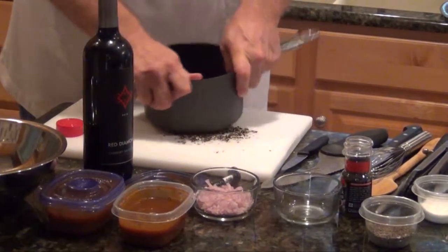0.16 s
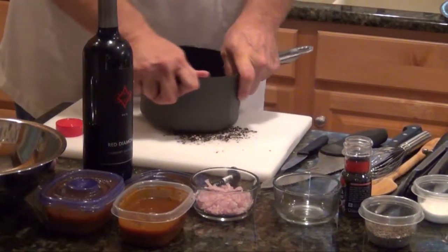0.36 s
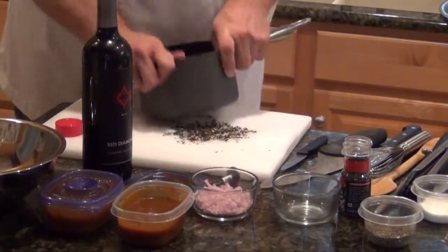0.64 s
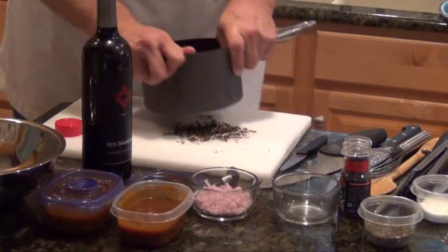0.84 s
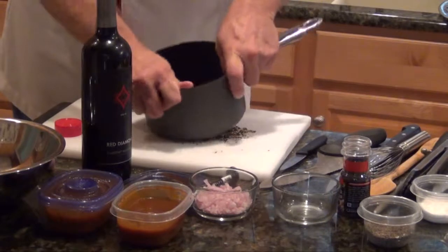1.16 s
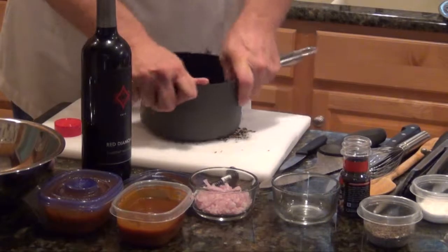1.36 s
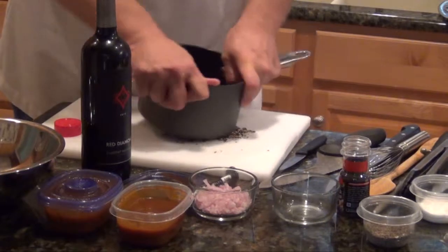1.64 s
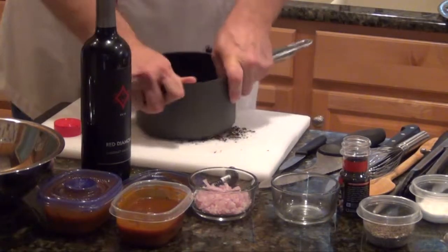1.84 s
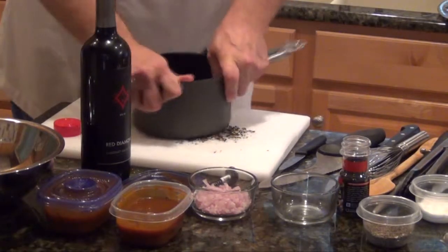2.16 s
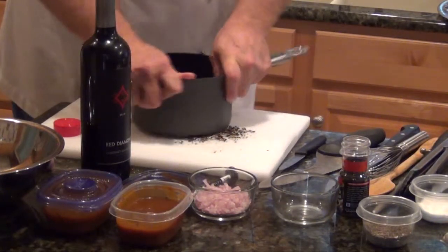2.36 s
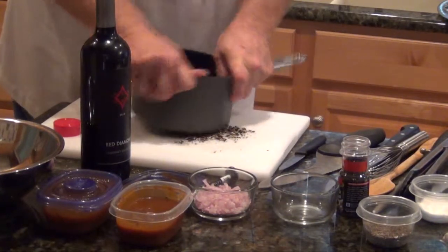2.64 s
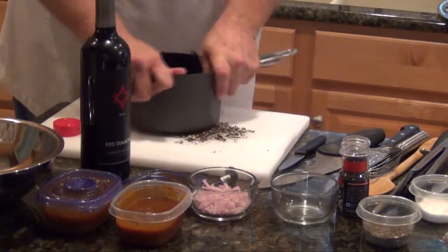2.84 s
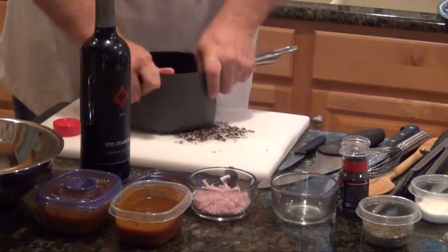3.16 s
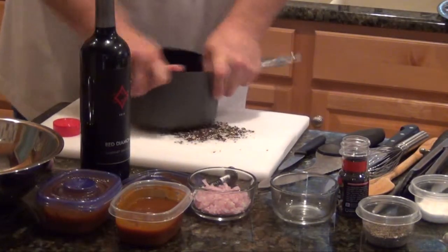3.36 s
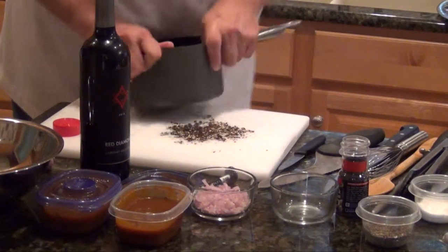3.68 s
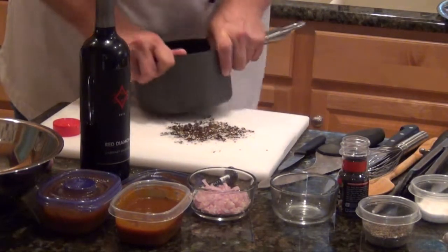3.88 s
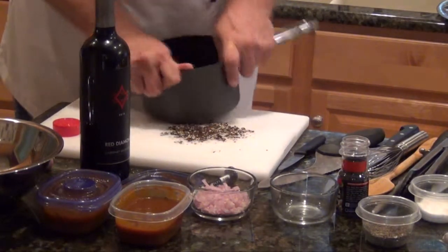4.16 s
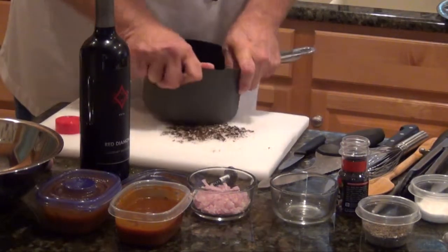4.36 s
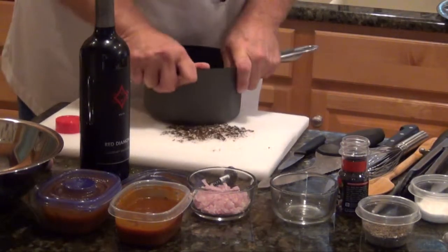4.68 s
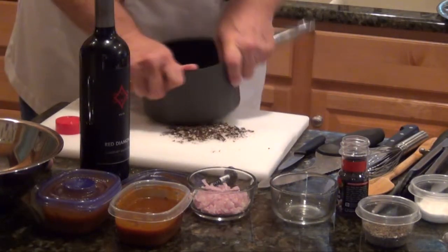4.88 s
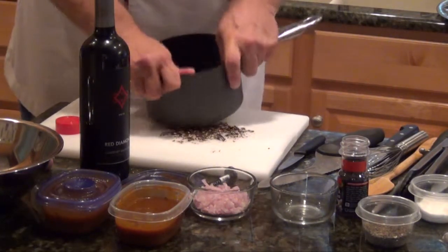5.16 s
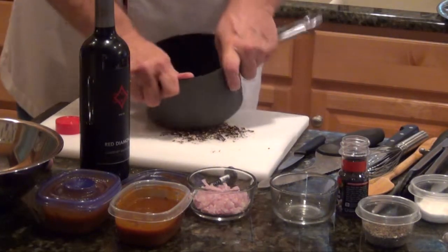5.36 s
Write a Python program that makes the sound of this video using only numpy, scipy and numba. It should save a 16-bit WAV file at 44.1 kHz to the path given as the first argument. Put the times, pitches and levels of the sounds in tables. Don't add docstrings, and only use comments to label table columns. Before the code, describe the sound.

Peppercorns crack sharply under a heavy metal saucepan rocked on a plastic board, with knocks, grinding crumbs and a faint fridge hum in a kitchen.

```python
import sys
import numpy as np
from scipy import signal
from scipy.fft import rfft, irfft, next_fast_len
from scipy.io import wavfile
from scipy.ndimage import uniform_filter1d, minimum_filter1d, map_coordinates
from numba import njit

SR = 44100
rng = np.random.default_rng(int(sys.argv[2]) if len(sys.argv) > 2 else 0)


def to_wav(s):
    ch = np.atleast_2d(s).T
    pcm = np.round(np.clip(ch, -1, 1) * 32767)
    wavfile.write(sys.argv[1], SR, pcm.astype(np.int16))


def how_loud(loudness_db):
    steps = np.asarray(loudness_db, float) / 20
    return 10 ** steps


N = 243240
BLOW_N = 8192

# (frequency [Hz], density [dB per Hz])
AIR_COLOUR = [(12, -71), (40, -39), (90, -32), (140, -15.5), (223, -12.5), (263, -13.5), (310, -14),
              (1160, -28.5), (2930, -29.5), (4550, -25.5), (14000, -34.5), (16500, -63)]
# (frequency [Hz], level [dB], width [Hz])
FRIDGE_TONES = [(124.7, -50, 6.4), (168, -45.5, 4)]
# (frequency [Hz], side minus mid [dB])
STEREO_WIDTH = [(60, -23), (110, -6), (200, -19), (380, -18.5), (700, -14), (1290, -14.5), (2380, -13.5),
                (4400, -13), (8120, -12.5), (15000, -16)]
# (frequency [Hz], t60 [s])
ROOM_T60 = [(200, 0.39), (600, 0.5), (1500, 0.52), (4000, 0.51), (10000, 0.37)]
# (frequency [Hz], level [dB])
WALL_COLOUR = [(200, 1), (1000, -3), (3000, -2.5), (7000, -3.5), (13000, -10.5)]
# (frequency [Hz], level [dB])
GROAN_COLOUR = [(20, -12), (40, -2), (70, -0.5), (110, -8.5), (200, -58)]
# (time of strongest swing [s], peak [dB])
THUMPS = [(.516, -25.5), (0.563, -30), (1.147, -25), (1.216, -24), (1.705, -36), (2.258, -32), (2.491, -25),
          (3.151, -19), (3.187, -23), (3.499, -22), (4.317, -15), (4.356, -27), (4.742, -30.5),
          (4.903, -24), (4.937, -35), (5.274, -29)]
# (time [s], peak [dB], frequency [Hz], t60 [s])
PINGS = [
    (0.884, -36, 1150, 0.2),
    (1.128, -16.5, 816, 0.067),
    (1.193, -25.5, 795, 0.083),
    (3.962, -37, 1150, 0.12),
    (4.418, -19, 690, 0.04),
    (5.251, -38, 6100, .15),
    (5.269, -36, 6100, .15),
]
# (time [s], pressure [dB])
PRESSURE = [(0, -13.5), (.14, -56), (.31, -31.5), (.49, -31), (.75, -46.5), (1.18, -52.5), (1.3, -33.5),
            (1.7, -29), (2.1, -39), (2.35, -33), (2.7, -42), (3.38, -43), (3.78, -51.5), (4.1, -46),
            (4.4, -33.5), (5.1, -47.5), (5.4, -40), (5.47, -27.5)]
# (time [s], peak [dB])
RIM_HITS = [
    (4.397, -6),
    (4.409, -9),
    (4.424, -10.5),
    (4.44, -21),
]
# (time [s], peak [dB], clack [dB], colour centre [Hz])
KNOCKS = [(.226, -4, -17, 990), (.318, -33, -11, 1100), (.506, 0, -6, 1150), (.519, 1.5, 0.5, 1235),
          (.545, -4.5, -17, 1130), (1.846, -11, 6.5, 1200), (2.469, -.5, -15, 685), (2.768, 0.5, -19, 925),
          (2.781, -1.5, -8, 850), (2.8, 3, -18, 950), (3.1274, 3.5, 0, 1150), (3.132, 2, -9, 1090),
          (3.17, -1, -7.5, 1020), (3.2, -8.5, -15, 900), (3.465, 2, -3, 1157), (3.49, -3.5, -10.5, 990),
          (4.15, -27.5, -5, 1000), (4.224, -15.5, -19, 920), (4.301, -1.5, -28, 556),
          (4.325, 2, -10.5, 1150), (4.398, -36, -12, 1270), (4.524, -9.5, -15, 1090),
          (4.724, -12.5, -8.5, 930), (4.881, 3.5, -4.5, 1194), (4.895, -1.5, 0.5, 1130),
          (4.915, -5.5, -6, 860), (5.27, -13.5, -14, 990), (5.482, -21, -7, 1220)]
# (time [s], peak [dB], colour centre [Hz])
TAPS = [
    (.883, -31, 1090),
    (1.128, -7, 810),
    (1.182, -18, 860),
    (1.193, -13, 785),
    (3.9606, -8, 760),
]
# (time [s], peak [dB], pan body [dB], splintering time [s])
BURSTS = [(0.0616, -4.5, -13, 0.04), (0.1729, -4, -23, .05), (0.1739, -9.5, -1.5, 0.029),
          (0.2131, 0.5, -8, 0.048), (.2202, -1.5, -11, 0.023), (.2504, -4.5, -5, 0.11),
          (.2859, -10, -4.5, 0.088), (.3731, -13.5, -6, 0.015), (0.4399, -5, -9, 0.012),
          (1.392, -6, -10.5, 0.015), (1.446, -1, -5.5, 0.022), (1.5276, -3.5, -24, 0.016),
          (1.5427, -11.5, -2.5, 0.12), (1.712, 1, -10.5, 0.018), (1.8379, -3.5, -13, 0.038),
          (2.1134, -16.5, -6.5, 0.11), (2.271, -9, 0.5, 0.07), (2.2833, -2.5, -10, 0.016),
          (2.4365, -8, 2, 0.061), (2.4515, -6.5, -32, 0.031), (2.6073, -6.5, -3.5, 0.06),
          (2.8929, -8, 1, 0.038), (2.8968, -6.5, -29, 0.051), (3.3154, 0, -8, 0.053),
          (3.3435, -8.5, -4.5, 0.096), (3.4355, -4, -11.5, 0.028), (4.2663, -16.5, -11, 0.11),
          (4.277, -5, -3.5, 0.023), (4.8821, -11, 2, 0.051), (5.475, -6, -12.5, 0.051)]
# (time [s], peak [dB], pan body [dB], board [dB])
CHIPS = [(.0284, -33, 4, -6), (0.4972, -12.5, 4.5, -8), (.5064, -23, 10, 8), (1.1265, -15.5, -14, 0),
         (1.288, -19.5, -14, -7), (1.3116, -23, -11, 8.5), (1.474, -23.5, 9.5, -20), (1.66, -16, -24, -40),
         (1.6905, -42.5, 20, -4), (1.9719, -20, -6, 0.5), (2.091, -20.5, -6.5, -2), (2.7237, -20, -14, -6),
         (2.7551, -29.5, 6, 10), (2.8005, -13.5, 4, 1), (3.101, -30.5, -3, 17.5), (3.1133, -26, 4, 5),
         (3.2832, -27.5, 0, 4), (3.6267, -26.5, 2.5, 12), (4.2224, -27, -8, -12), (4.258, -26.5, 1, 5),
         (4.2943, -24.5, 5, 20.5), (4.4114, -22.5, 2, 0), (4.5261, -20.5, -2, -10), (4.554, -16, -10, -17),
         (4.724, -26.5, 5, -12), (5.2496, -30, -4, 3), (5.2685, -22.5, -7, -0.5), (5.453, -20.5, -11, 10),
         (5.464, -15, -13, -3), (5.4894, -24, 3, 4)]
# (frequency [Hz], width [Hz], level [dB])
PAN_MODES = [(1150, 157, -49), (2157, 138, 17), (3634, 196, -6), (4348, 77, 6), (5187, 186, -16.5),
             (5820, 87, -20), (6130, 114, -3.5), (7427, 114, 14.5), (8410, 120, -32), (8990, 180, 2),
             (9975, 180, -14), (11070, 260, -2.5), (12250, 220, -6)]
# (frequency [Hz], width [Hz], level [dB])
BOARD_MODES = [(507, 103, -14), (696.6, 16.5, 25), (795, 58, -5), (900, 103, 18), (1090, 115, 3.5),
               (1150, 69, 17), (1465, 58, -4), (1540, 34, 16), (1692, 31, -15)]
# (frequency [Hz], level [dB])
SNAP = [(1200, -70.5), (3000, -7), (4500, -3.5), (6300, -3.5), (9000, 2.5), (12500, 1), (13500, 2),
        (15800, -3), (16800, 0)]
# (frequency [Hz], level [dB])
PAN_BODY = [(700, -62.5), (1600, -21.5), (2400, 7.5), (3800, -2), (6000, -6.5), (12000, -81.5)]
# (frequency [Hz], level [dB])
SLAB = [(200, -25), (400, -4.5), (600, 0.5), (900, 2), (1250, 2.5), (1700, -2), (2600, -29), (6000, -32.5),
        (14000, -123)]
# (frequency [Hz], level [dB])
CLACK = [(700, -25), (1500, -8), (2200, 6), (3200, -1.5), (4500, -7.5), (7000, -16.5), (12000, -23),
         (16000, -71)]
# (frequency [Hz], level [dB])
COUNTER = [(40, -63), (90, -12.5), (130, -0.5), (230, 22), (380, -1), (800, -83)]
# (frequency [Hz], level [dB])
RIM_COLOUR = [(700, -42), (1500, -2), (1900, 6.5), (2400, 9.5), (2900, -12.5), (6000, -36), (14000, -70)]
# (edge [Hz], treble needed to keep what lies above [dB])
TREBLE_GATES = [(14350, -72.5), (15050, -62), (15900, -47)]


def unit(x):
    return x / np.sqrt(np.mean(x ** 2) + 1e-20)


def along(points, hz):
    f, v = np.transpose(points)
    return np.interp(np.log(hz + 1), np.log(f + 1), v)


def causal(points, hz):
    cepstrum = irfft(along(points, hz) * np.log(10) / 20)
    half = cepstrum.shape[-1] // 2
    cepstrum[..., 1:half] *= 2
    cepstrum[..., half + 1:] = 0
    return np.exp(rfft(cepstrum))


def resonances(modes, hz, extra_db, sharp):
    f, width, db = np.transpose(modes)[:, :, None]
    damping = 1j * hz * width * sharp
    shapes = damping / (f * f - hz * hz + damping)
    signs = (-1.) ** np.arange(len(f))[:, None]
    return how_loud(extra_db) @ (shapes * how_loud(0.27 * db) * signs)


def filtered(x, response):
    m = next_fast_len(N + SR) // 2 * 2
    return irfft(rfft(x, m) * response(np.fft.rfftfreq(m, 1 / SR)), m)[..., :N]


def spread(pair, extra_db):
    side = filtered(pair[1], lambda hz: how_loud(along(STEREO_WIDTH, hz) + extra_db))
    return np.array([pair[0] + side, pair[0] - side])


def blows(events, colours, modes, ring_db, sharp, scatter_db, spikes, onset, push):
    s, db, second_db, third_db, life, *centre = np.transpose(events)[:, :, None]
    t, hz = np.arange(BLOW_N) / SR, np.fft.rfftfreq(BLOW_N, 1 / SR)
    chance = rng.standard_normal((len(s), 2 * BLOW_N + len(modes)))

    swings = uniform_filter1d(chance[:, BLOW_N:2 * BLOW_N], size=25, axis=1) * 5
    burst = chance[:, :BLOW_N] * how_loud(spikes * swings) * how_loud(-60 * t / np.clip(life, .003, .1))
    burst *= 1 + onset * np.exp(-(t / .0035) ** 2)
    burst[:, 0] = push
    burst /= np.linalg.norm(burst[:, :200], axis=1, keepdims=True)

    shifted = hz * 900 / centre[0] if centre else hz
    levels = zip((0 * db, second_db, third_db), colours, (shifted, hz, hz))
    mix = sum(how_loud(level + trim_db) * causal(colour, f) for level, (colour, trim_db), f in levels)
    mode_db = scatter_db * chance[:, 2 * BLOW_N:]
    ring = 1 + how_loud(ring_db) * resonances(modes, hz, mode_db, sharp)

    loud_db = db + 0.95 * np.clip(db + 3.5, 0, None)
    sounds = how_loud(loud_db) * irfft(rfft(burst) * mix * ring)
    buses = np.zeros((4, N + BLOW_N))
    for k, (at, sound) in enumerate(zip(s[:, 0], sounds)):
        buses[k % len(buses), round(at * SR):][:BLOW_N] += sound
    return buses[:, :N]


def background():
    air = filtered(rng.standard_normal((2, N)), lambda hz: how_loud(along(AIR_COLOUR, hz)))
    t = np.arange(N) / SR
    drone = 0
    for hz, db, width in FRIDGE_TONES:
        drift = np.cumsum(rng.standard_normal(N)) * np.sqrt(2 * np.pi * width / SR) * 0.65
        drone = drone + how_loud(db + 4.5) * np.sin(2 * np.pi * hz * t + drift)
    return spread(how_loud(-43.5) * unit(air), extra_db=2.0) + drone


def rumble():
    sway_db = map_coordinates(rng.standard_normal(40), [np.arange(N) * 5 / SR])
    low = filtered(rng.standard_normal(N), lambda hz: how_loud(along(GROAN_COLOUR, hz)))
    return how_loud(-51.5 + sway_db) * unit(low)


def kitchen(buses):
    noise = rng.standard_normal((len(buses), 2, SR * 3 // 4))
    hz, t, z = signal.stft(noise, SR, nperseg=256)
    decay_db = along(WALL_COLOUR, hz)[:, None] - 60 * t / along(ROOM_T60, hz)[:, None]
    tails = signal.istft(z * how_loud(decay_db), SR, nperseg=256)[1]
    u = np.arange(tails.shape[2]) / SR
    tails *= 1 - np.exp(-u / .005)
    tails *= 1 + 1.6 * np.exp(-u / .016)
    tails /= np.sqrt(SR / 60)
    return spread(signal.fftconvolve(buses[:, None], tails, axes=2).sum(0)[:, :N], extra_db=4.0)


def thumps():
    swing_hz, rise_s, fall_s = 131, 0.0054, 0.0084
    t, low = np.arange(-SR // 10, SR // 10) / SR, np.zeros(N + SR)
    swell = np.exp(-(t / np.where(t < 0, rise_s, fall_s)) ** 2 / 2)
    for (s, db), (bend, turn) in zip(THUMPS, rng.standard_normal((len(THUMPS), 2))):
        swing = np.cos(2 * np.pi * swing_hz * (1 + 0.082 * bend) * t + 2 * turn)
        low[round(s * SR):][:len(t)] += how_loud(db) * swell * swing
    return low[SR // 10:][:N]


def pings():
    t, out = np.arange(SR // 2) / SR, np.zeros(N + SR)
    for s, db, hz, t60 in PINGS:
        envelope = how_loud(db - 60 * t / t60) * (1 - np.exp(-t / 0.0051))
        out[round(s * SR):][:len(t)] += envelope * np.sin(2 * np.pi * hz * t)
    return out[:N]


def grind():
    t = np.arange(N) / SR
    pressure_db = np.interp(t, *np.transpose(PRESSURE))

    skid_db, skid_rise_s, skid_t60_s = -17, 0.025, 0.16
    starts, u = np.zeros(N), t[:SR // 2]
    knock_at = [round(row[0] * SR) for row in KNOCKS]
    starts[knock_at] = how_loud(np.array([row[1] for row in KNOCKS]) + skid_db)
    slide = how_loud(-60 * u / skid_t60_s) * (1 - np.exp(-u / skid_rise_s))
    skid = signal.fftconvolve(starts, slide)[:N]

    noise = rng.standard_normal((2, N))
    grains = noise * how_loud(9 * np.minimum(rng.exponential(size=(2, N)), 6) ** .6)
    hz = np.fft.rfftfreq(BLOW_N, 1 / SR)
    ringing = 1 + how_loud(12.5) * resonances(PAN_MODES, hz, np.zeros(len(PAN_MODES)), 0.69)
    bright = irfft(ringing * (causal(SNAP, hz) + 1.2 * causal(PAN_BODY, hz)))
    dull = irfft(ringing * causal(SLAB, hz))
    grit = unit(signal.oaconvolve(grains[0], bright)[:N])
    drag = unit(signal.oaconvolve(grains[1], dull)[:N])

    grit_level = how_loud(1.137 * pressure_db) + how_loud(-17) * skid
    drag_level = how_loud(pressure_db + 0.5) + skid
    return grit_level * how_loud(-6.0) * grit + drag_level * how_loud(-7) * drag


def rim():
    rows = [(s, db, -14, -30, 0.019) for s, db in RIM_HITS]
    colours = [(RIM_COLOUR, 0), (SLAB, 0), (SNAP, 0)]
    return how_loud(20) * blows(rows, colours, PAN_MODES, ring_db=-16, sharp=1.0, scatter_db=2.0,
                           spikes=2.3, onset=0.74, push=9.1)


def knocks():
    thump_db, contact_s = -35, 0.028
    tap_clack_db, tap_s = -19, 0.011
    rows = [(s, db, clack_db, thump_db, contact_s, hz) for s, db, clack_db, hz in KNOCKS]
    rows += [(s, db, tap_clack_db, thump_db, tap_s, hz) for s, db, hz in TAPS]
    colours = [(SLAB, 0), (CLACK, -3), (COUNTER, 6)]
    return how_loud(20.5) * blows(sorted(rows), colours, BOARD_MODES, ring_db=3.5, sharp=0.7, scatter_db=0.0,
                             spikes=3.5, onset=0.52, push=34)


def cracks():
    rows = [(s, db, pan_db, board_db, 0.03) for s, db, pan_db, board_db in CHIPS]
    for s, db, pan_db, life in BURSTS:
        board_db = -11.5 + 126 * life + 1.47 * s
        rows.append((s, db, pan_db, board_db, life))
    colours = [(SNAP, 0), (PAN_BODY, 8), (SLAB, 10)]
    return how_loud(7.0) * blows(sorted(rows), colours, PAN_MODES, ring_db=15, sharp=1.0, scatter_db=0.37,
                            spikes=4.2, onset=0.79, push=6.2)


def scene():
    buses = cracks() + knocks() + rim()
    buses[0] += grind() + pings()
    pan = buses.sum(0) + thumps() + how_loud(1.5) * kitchen(buses)
    balance = how_loud([[.45], [-.45]])
    return pan * balance + background() + rumble()


def starve(x):
    hz, _, z = signal.stft(x, SR, nperseg=1024)
    under = (hz > 12500) & (hz < TREBLE_GATES[0][0])
    treble = np.sqrt((np.abs(z[:, under]) ** 2).sum(0).mean(0))
    for edge_hz, db in TREBLE_GATES:
        z[:, hz > edge_hz] *= treble > how_loud(db)
    return signal.istft(z, SR, nperseg=1024)[1][:, :N]


@njit
def follow(peaks, fall):
    out = peaks.copy()
    for k in range(1, len(out)):
        out[k] = max(out[k], out[k - 1] * fall)
    return out


def top_cut(x):
    return signal.sosfilt(signal.butter(12, 16820, fs=SR, output="sos"), x)


def record(dry):
    held = follow(np.maximum(np.abs(dry).max(0), .95), how_loud(-150 / SR))
    ahead = -minimum_filter1d(-held, size=17)
    gain = uniform_filter1d(1.086 / ahead, size=17)
    limited = np.clip(dry * gain, -1, 1)
    return top_cut(np.clip(starve(limited), -1, 1))


dry = scene()
out = record(dry)
to_wav(out)
```